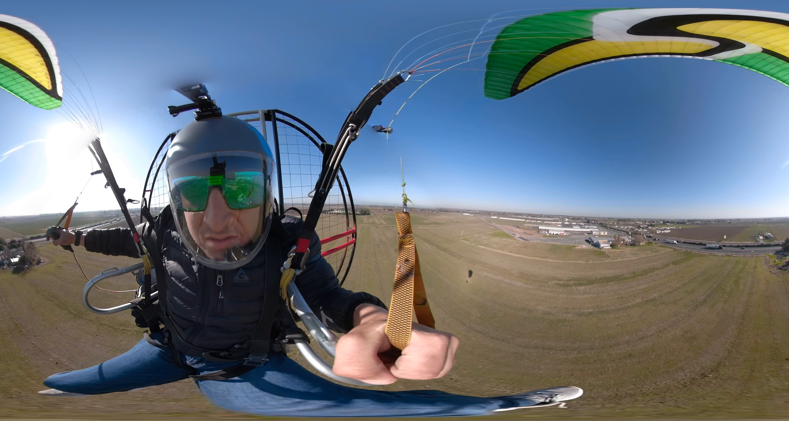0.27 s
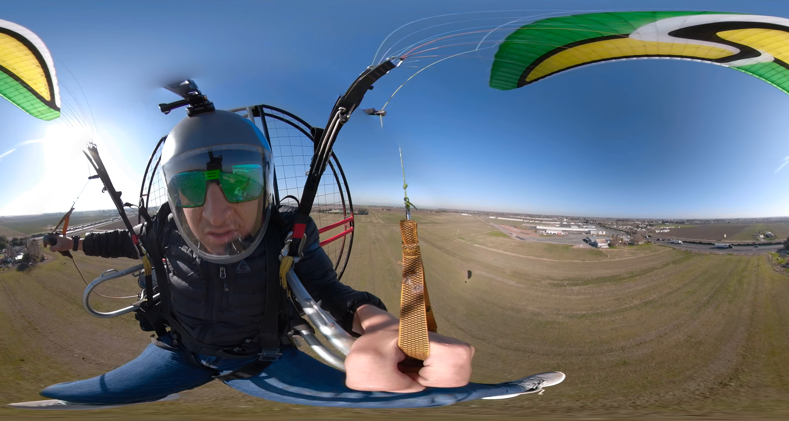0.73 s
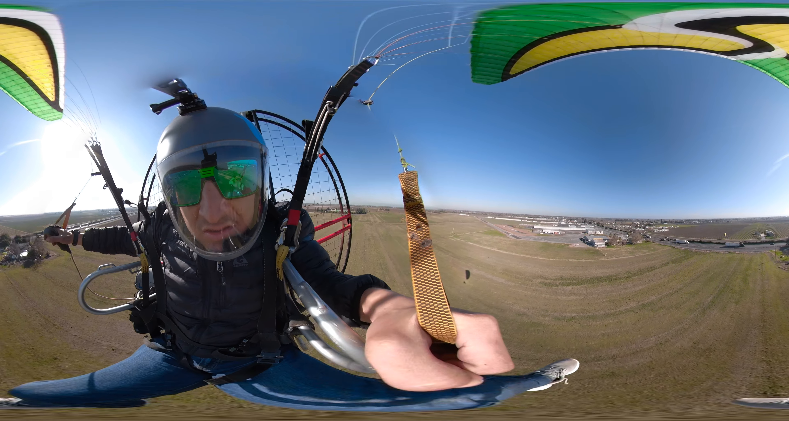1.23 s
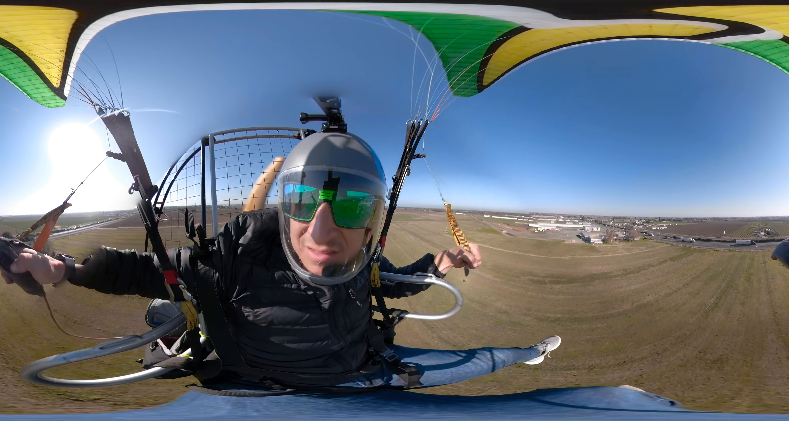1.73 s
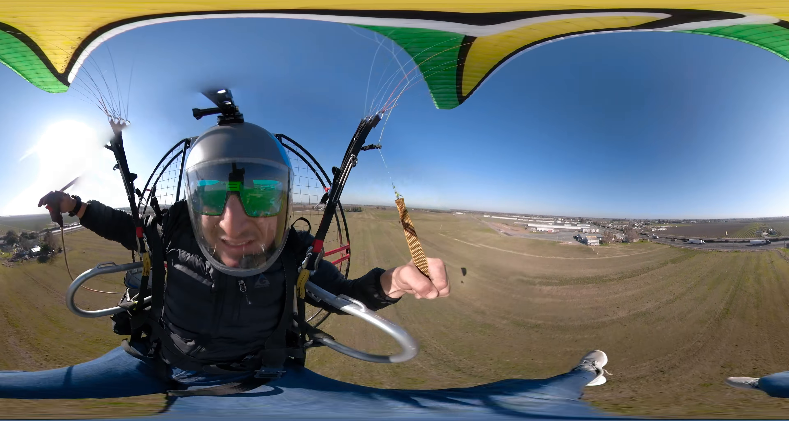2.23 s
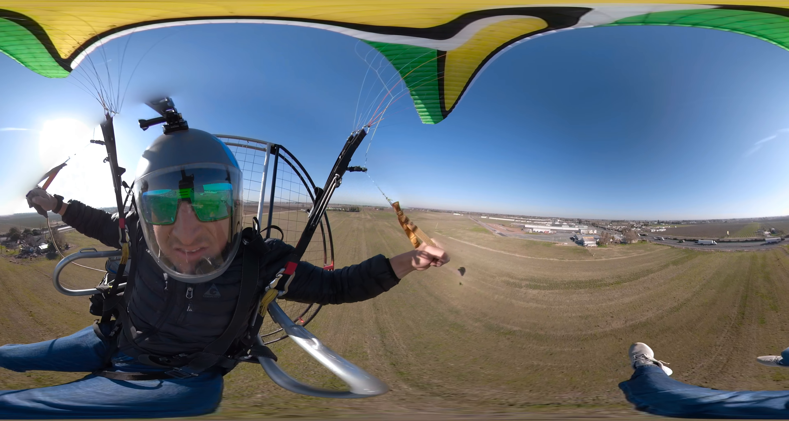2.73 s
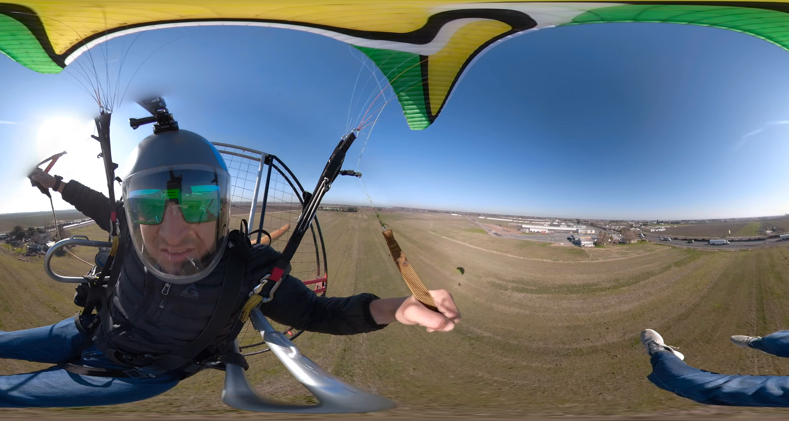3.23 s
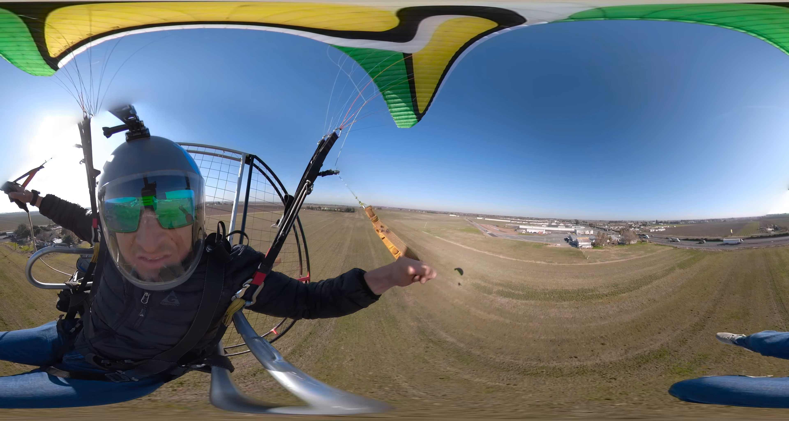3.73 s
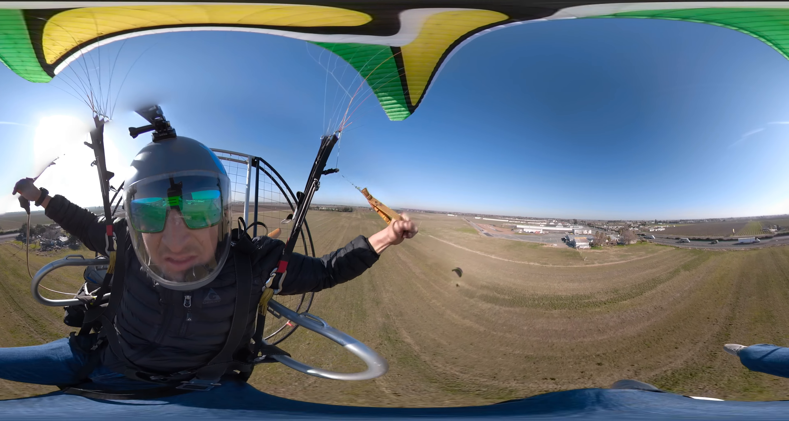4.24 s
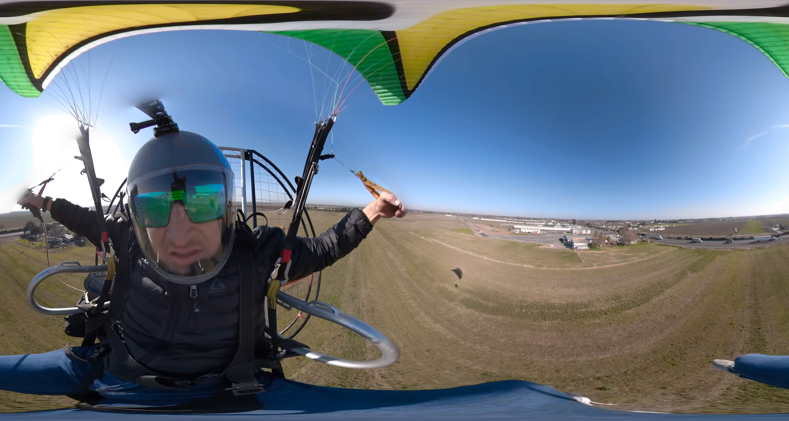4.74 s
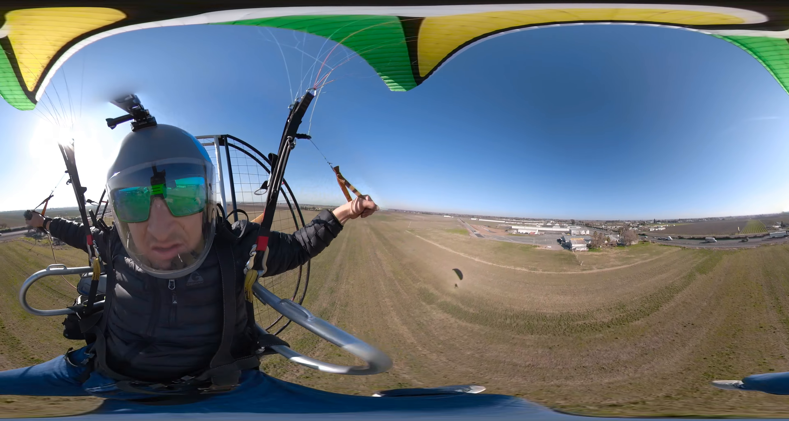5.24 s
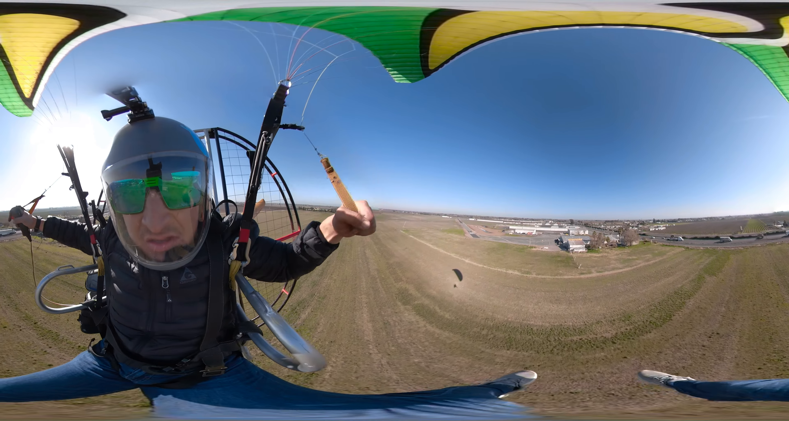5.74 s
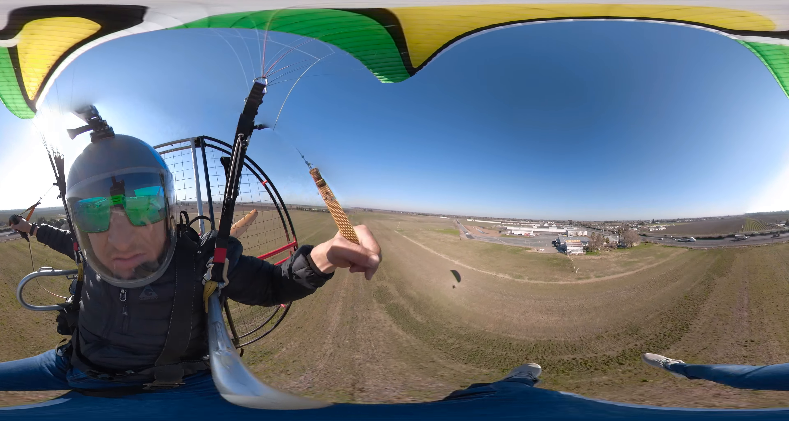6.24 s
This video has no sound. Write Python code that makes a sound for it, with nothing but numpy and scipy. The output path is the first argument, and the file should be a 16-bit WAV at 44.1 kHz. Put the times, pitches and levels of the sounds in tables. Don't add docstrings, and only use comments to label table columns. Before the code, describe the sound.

Rough, sputtering propeller motor drone stops abruptly; slowing puffs, metallic chirp and thump, loose ticks and ringing follow, then mostly low wind rumble.

```python
import sys
import numpy as np
from scipy import signal
from scipy.io import wavfile
from scipy.ndimage import uniform_filter1d

SR = 44100
rng = np.random.default_rng(int(sys.argv[2]) if len(sys.argv) > 2 else 0)


def gain_from_decibels(decibels):
    exponent = np.asarray(decibels, float) / 20
    return 10 ** exponent


def generate_wav(signal):
    frames = np.transpose(np.atleast_2d(signal))
    scaled = np.clip(frames, -1, 1) * 32767
    pcm = np.round(scaled).astype(np.int16)
    wavfile.write(sys.argv[1], SR, pcm)


N = 285768

# time_s, speed_turns_per_s
CRANK_SPEED = [(0, 47), (2.54, 46.6), (2.67, 41.4), (2.97, 31.5), (3.25, 23.6), (3.5, 16.6), (3.7, 13.5),
               (3.9, 10), (4.2, 7), (6.48, 1)]
FULL_SPEED, IGNITION_CUT_S, CRANK_STOPS_S = 47, 2.55, 4.22
ROCK_LEAD_TURNS = .37


def rms_one(x):
    return x / np.sqrt(np.mean(x ** 2) + 1e-20)


def in_time(rows):
    s, *columns = np.transpose(rows)
    return [np.interp(np.arange(N) / SR, s, c) for c in columns]


def drift(rate):
    r = np.exp(-80 * np.pi * rate / SR)
    white = rng.standard_normal(N // 40 + 2002)
    slow = signal.lfilter([1], [1, -2 * r, r * r], white)[2000:]
    return np.interp(np.arange(N) / 40, np.arange(len(slow)), rms_one(slow))


def clicks(times, gains):
    out = np.full(N, 1e-18)
    at = np.round(np.asarray(times) * SR).astype(int)
    np.add.at(out, np.clip(at, 0, N - 1), gains)
    return out


def soften(x, window):
    return np.convolve(x, window)[:N]


def strike(times, gains, modes, scatter_db):
    out, chance = 0, rng.standard_normal((len(times), len(modes)))
    for (hz, level_db, t60), luck in zip(modes, chance.T):
        r, w = gain_from_decibels(-60 / (t60 * SR)), 2 * np.pi * hz / SR
        blows = clicks(times, gains * gain_from_decibels(level_db + scatter_db * luck))
        out = out + signal.lfilter([0, np.sin(w)], [1, -2 * r * np.cos(w), r * r], blows)
    return out


def chatter(times, gains, modes):
    touches = (np.asarray(times)[:, None] + .006 * rng.random((len(times), 6))).ravel()
    return soften(strike(touches, np.repeat(gains, 6), modes, scatter_db=4), np.hanning(7) / 2)


def narrow_noise(peaks, flicker_db, rate):
    out = 0
    for hz, width, level_db in peaks:
        r = np.exp(-np.pi * width / SR)
        b, a = [1, 0.011, -0.992], [1, -2 * r * np.cos(2 * np.pi * hz / SR), r * r]
        once = signal.lfilter(b, a, rng.standard_normal(N))
        ringing = signal.lfilter(b, a, once)
        out = out + gain_from_decibels(level_db + flicker_db * drift(rate)) * rms_one(ringing)
    return out


def banded_noise(spectrum, patchy_db, shared, rate):
    hz, level_db = np.transpose(spectrum)
    out, together, white = 0, drift(rate), rng.standard_normal((2, N))
    edges = hz[0] * 2 ** np.arange(0, np.log2(min(hz[-1], 17000) / hz[0]), 1 / 3)
    for k, (low, high) in enumerate(zip(edges, edges[1:])):
        band_filter = signal.butter(2, [low, high], "band", fs=SR, output="sos")
        band = signal.sosfilt(band_filter, white[k % 2])
        colour_db = np.interp(np.log(low * high) / 2, np.log(hz), level_db)
        out = out + gain_from_decibels(colour_db + patchy_db * (shared * together + drift(rate))) * band
    return rms_one(out)


def wavering(hz, width):
    steps = np.cumsum(width) / SR
    luck = rng.standard_normal((2, int(steps[-1]) + 2))
    a, b = (np.interp(steps, np.arange(len(row)), row) for row in luck)
    phase = 2 * np.pi * np.cumsum(hz) / SR
    return rms_one(a * np.cos(phase) + b * np.sin(phase))


def firings():
    # start_s, level_db
    fired = [(0.0771, -4.5), (0.143, -5), (0.1627, -2.5), (0.2054, -0.5), (0.247, 1), (0.272, -4),
             (0.3082, 2), (0.3513, 0.5), (0.4152, 4), (0.4585, 3.5), (0.5009, 1), (0.5423, 4.5),
             (0.5837, 0.5), (0.628, 1), (0.692, 1), (0.735, -0.5), (0.7996, 2.5), (0.8402, 0), (0.9074, 1),
             (0.949, 4), (0.9914, 0.5), (1.033, 2.5), (1.0991, 2.5), (1.1416, 3.5), (1.1836, -1),
             (1.248, 1), (1.2896, 2), (1.3326, 0.5), (1.3763, -2.5), (1.418, -5), (1.461, -5.5), (1.526, 0),
             (1.569, 0.5), (1.6295, -0.5), (1.674, -3), (1.7141, -5.5), (1.758, -4.5), (1.803, -3),
             (1.8621, -0.5), (1.9063, -1.5), (1.9482, -3), (1.969, -4.5), (2.009, 1), (2.0524, -5),
             (2.0943, 0), (2.135, -3.5), (2.203, -2.5), (2.245, 2.5), (2.3086, -2.5), (2.352, 2),
             (2.394, 1), (2.437, -4), (2.456, -4), (2.501, -3.5), (2.5221, -4), (2.543, -1)]
    s, db = np.transpose(fired)
    return s, db


def crank(fired_s):
    compressions = [2.965, 3.066, 3.178, 3.304, 3.403, 3.516, 3.659, 3.755, 3.844, 3.957, 4.087, 4.185]
    free = np.cumsum(in_time(CRANK_SPEED)[0]) / SR
    marks = free[(np.r_[fired_s, compressions] * SR).astype(int)]
    whole = np.cumsum(np.r_[0, np.round(np.diff(marks))])
    count = len(fired_s)
    marks[:count] = whole[:count] + uniform_filter1d((marks - whole)[:count], size=7)
    turns = np.r_[-marks[0], whole, whole[-1] + free[-1] - marks[-1]]
    return np.interp(free, np.r_[0, marks, free[-1]], turns)


def load():
    t, slower_db = np.arange(N) / SR, 20 * np.log10(in_time(CRANK_SPEED)[0] / FULL_SPEED)
    since_cut = np.maximum(t - IGNITION_CUT_S, 0)
    coasting = np.clip((t - IGNITION_CUT_S) / .05, 0, 1)
    pump_db = 1 + 2.7 * slower_db
    chuff_db = -10.5 + 0.71 * slower_db - 8 * np.exp(-since_cut / 0.52)
    chuff_db = chuff_db - 50 * (1 - coasting * (t < CRANK_STOPS_S))
    blade_db = -1 + 0.59 * slower_db - 28 * np.maximum(t - IGNITION_CUT_S - .15, 0)
    hiss_db = -49 - 1.5 * coasting + slower_db - 40 * np.clip(t - CRANK_STOPS_S, 0, 2)
    return pump_db, chuff_db, blade_db, hiss_db


def pops(fired_s, fired_gain):
    # pitch_hz, level_db, t60_s
    pop_modes = [(122, -18, 0.036), (165.4, -16.5, 0.076), (310, -15.5, 0.022)]
    early = strike(fired_s - .0017, fired_gain, pop_modes[2:], scatter_db=3)
    return early - strike(fired_s + .0014, fired_gain, pop_modes[:2], scatter_db=3)


def pumping(turn_s, missed, pumped):
    # pitch_hz, level_db, t60_s
    pump_modes = [(49.3, -39.5, 0.19), (317, -20, 0.029), (449, -17.5, 0.035)]
    suck_modes = [(120, -19, .04), (166, -19, .04)]
    slosh_modes = [(266.3, -11.5, 0.049)]
    coasting = turn_s > IGNITION_CUT_S
    late = .00025 * rng.standard_normal(len(turn_s))
    dip_s = turn_s - .002 + late * missed * (1 + 2 * coasting)
    out = -strike(dip_s, pumped, pump_modes, scatter_db=2.5)
    out -= strike(turn_s - .002, missed * pumped, suck_modes, scatter_db=0.5)
    slosh_gain = missed * (turn_s < IGNITION_CUT_S) * pumped
    return out + strike(turn_s + .00754 + late, slosh_gain, slosh_modes, scatter_db=2.0)


def chuffs(turn_s, coasting_gain):
    # pitch_hz, level_db, t60_s
    chuff_modes = [(110.7, 4, 0.084), (137, 0, 0.046), (225.6, -9.5, 0.21), (390, -11.5, 0.073)]
    # peak_s, spread_s, pitch_hz, level_db, t60_s
    cold_modes = [
        (2.736, 0.091, 240, -10, 0.057),
        (3.35, 0.052, 240, -19, 0.16),
        (3.32, 0.039, 74, -18, .12),
    ]
    out = strike(turn_s - .0075, coasting_gain, chuff_modes, scatter_db=.8)
    for peak_s, spread_s, *mode in cold_modes:
        gain = (turn_s > IGNITION_CUT_S) * gain_from_decibels(-((turn_s - peak_s) / spread_s) ** 2)
        out += strike(turn_s + .00754, gain, [mode], scatter_db=1)
    return out


def cracks(fired_s, fired_gain, turn_s, missed):
    # pitch_hz, level_db, t60_s
    crack_modes = [(417.6, -15, 0.029), (549, -25.5, 0.047), (855, -25.5, 0.027), (1150, -21, 0.0096),
                   (1545, -21.5, 0.019), (1867, -33, 0.03), (3514, -34, 0.027), (5630, -29.5, 0.03)]
    sharp = strike(fired_s - .0005, fired_gain, crack_modes[:2], scatter_db=2)
    sharp -= strike(fired_s + 0.000912, fired_gain, crack_modes[2:], scatter_db=2)
    sputter = gain_from_decibels(-13.5 + 4 * rng.standard_normal(len(turn_s))) * missed * (turn_s < IGNITION_CUT_S)
    sharp -= strike(turn_s + .001, sputter, crack_modes, scatter_db=2.0)
    return soften(sharp, np.hanning(9) / 4)


def reed_valve(turn_s):
    # time_s, level_db
    reed_levels = [(2.7, -50), (2.95, -38), (3.15, -31), (3.42, -30), (3.6, -35), (4.0, -48), (4.2, -70)]
    # pitch_hz, level_db, t60_s
    putt_modes = [(1850, -1, .028), (2020, -2, .026), (1550, -9, .015), (2300, -8, .014)]
    gain = gain_from_decibels(np.interp(turn_s, *np.transpose(reed_levels)) - 3)
    return soften(strike(turn_s - .002, gain, putt_modes, scatter_db=2), np.hanning(9) / 4)


def gas_gate(fired_s, fired_db, turn_s, missed, pump_turn_db):
    lead_s = (turn_s > IGNITION_CUT_S) * ROCK_LEAD_TURNS * np.gradient(turn_s)
    puff_db = 9.0 + pump_turn_db / 5 + rng.standard_normal(len(turn_s))
    puffs = clicks(fired_s - .004, gain_from_decibels(fired_db + 15.5))
    puffs += clicks(turn_s - .002 - lead_s, missed * gain_from_decibels(puff_db))
    t = np.arange(0, .03, 1 / SR) / .0025
    return signal.fftconvolve(puffs, t ** 2 * np.exp(-t))[:N]


def exhaust(angle, fired_s, fired_db, pump_db, chuff_db):
    at = np.flatnonzero(np.diff(np.floor(angle)))
    turn_s, fired_gain = at / SR, gain_from_decibels(fired_db)
    missed = np.abs(turn_s[:, None] - fired_s).min(axis=1) > .005
    low = pops(fired_s, fired_gain) + pumping(turn_s, missed, gain_from_decibels(pump_db[at]))
    low += chuffs(turn_s, gain_from_decibels(chuff_db[at]))
    opening = np.hanning(45)
    sound = soften(low, opening / opening.sum()) + reed_valve(turn_s)
    sound += cracks(fired_s, fired_gain, turn_s, missed)
    return sound, gas_gate(fired_s, fired_db, turn_s, missed, pump_db[at])


def gas_hiss(hiss_db, drag_db, gate):
    # pitch_hz, level_db (per Hz)
    hiss_spectrum = [(1100, -2), (1800, -5), (2760, -10.5), (3400, -5), (4270, -14.5), (5600, 3),
                     (6500, -8.5), (7500, -14), (8600, -33.5), (9500, -18), (10800, -15), (13000, -28),
                     (15500, -42), (17000, -70)]
    lifted_db = -28 * np.maximum(np.arange(N) / SR - 5.14, 0)
    level = np.hypot(gain_from_decibels(hiss_db), gain_from_decibels(drag_db + 1.5 + lifted_db))
    return level * (1 + gate) * banded_noise(hiss_spectrum, patchy_db=1, shared=1.0, rate=140)


def propeller(angle, level_db):
    # multiple, level_db
    blade_tones = [(1, -30), (2, -35), (3, -25), (4, -28), (5, -36), (6, -34), (7, -26), (8, -35),
                   (11, -42)]
    blade = 2 * np.pi * .643 * angle
    out = gain_from_decibels(-60) * np.sin(blade + 2 * np.pi * angle)
    for multiple, tone_db in blade_tones:
        phase = round(multiple) * blade + 0.6 * drift(1.12) + rng.uniform(0, 2 * np.pi)
        out = out + gain_from_decibels(tone_db + 0.86 * drift(13.0)) * np.sin(phase)
    return np.sqrt(2) * gain_from_decibels(level_db) * out


def rocking(angle):
    # pitch_hz, level_db, t60_s
    rock_modes = [(5100, 0, .014), (5500, -3, .012), (3550, -7, .018), (7600, -12, .01)]
    s = np.flatnonzero(np.diff(np.floor(angle + ROCK_LEAD_TURNS))) / SR
    return chatter(s - .001, gain_from_decibels(-43 - ((s - 3.54) / .06) ** 2), rock_modes)


def jolts():
    # start_s, level_db
    jolt_events = [(1.1, -46), (1.378, -49), (1.529, -38.5), (1.57, -46), (1.907, -42), (2.011, -50),
                   (2.097, -53), (2.356, -45)]
    # pitch_hz, level_db, t60_s
    bracket_modes = [(3480, 0, .03), (3700, -1, .025)]
    s, db = np.transpose(jolt_events)
    return chatter(s, gain_from_decibels(db), bracket_modes)


def shoe_drag():
    # time_s, level_db
    drag_levels = [(0, -49), (.4, -60), (2.4, -54), (2.8, -63), (3.3, -55), (3.8, -51), (4.25, -62.5),
                   (4.55, -60.5), (4.75, -57), (5.1, -55), (5.3, -65), (5.5, -75.5), (5.9, -86.5),
                   (6.1, -92), (6.48, -98)]
    return in_time(drag_levels)[0]


def clutch(drag_db):
    # start_s, level_db
    catches = [(.94, -45), (2.57, -41), (3.1, -60), (3.24, -48), (3.431, -38.5), (3.7, -40), (3.779, -40),
               (3.96, -38), (4.01, -45), (4.11, -45), (4.46, -72), (4.63, -46), (4.8, -70), (5.0, -50),
               (5.09, -39), (5.17, -48), (5.29, -65)]
    # time_s, pitch_hz, width_hz, partner_db
    ring_course = [(0, 7180, 110, -9), (3.0, 7130, 110, -12), (3.75, 7180, 120, -8), (3.95, 7125, 70, -6),
                   (4.5, 7110, 60, -10), (4.75, 7140, 80, -12), (5.05, 7090, 70, -12), (5.3, 7135, 80, -12),
                   (6.48, 7130, 90, -14)]
    # pitch_hz, width_hz, level_db
    drum_peaks = [(3400, 140, -24), (7550, 900, -9), (10500, 2200, -29)]
    s, db = np.transpose(catches)
    t = np.arange(0, .25, 1 / SR)
    swell = (1 - np.exp(-t / 0.0084)) * np.exp(-t / 0.0089) * 2
    caught = signal.fftconvolve(clicks(s, gain_from_decibels(db)), swell)[:N]
    hz, width, partner_db = in_time(ring_course)
    ring = gain_from_decibels(-1 + 4 * drift(31)) * wavering(hz, 1.6 * width)
    ring += gain_from_decibels(partner_db + 4 * drift(20)) * wavering(0 * hz + 7335, width)
    return (gain_from_decibels(drag_db) + caught) * (ring + narrow_noise(drum_peaks, flicker_db=6, rate=20))


def squeal():
    # start_s, length_s, lowest_hz, level_db
    squeals = [
        (3.828, .034, 3325, -25),
        (3.864, .04, 3322, -39),
        (3.908, .06, 3385, -58),
        (3.965, .055, 3385, -54),
    ]
    overtones = [(-22, 1, 0), (-20, 2, 14), (-46, 1, 5), (-73, 1.2, 0)]
    out = np.zeros(N)
    for s, length, hz, level_db in squeals:
        t = np.arange(0, length, 1 / SR)
        slip = (2 * t / length - 1) ** 4
        pitch = hz + 22 * drift(400)[:len(t)] + 190 * slip * gain_from_decibels((level_db + 25) / 2)
        phase = 2 * np.pi * np.cumsum(pitch) / SR
        shape = np.minimum(1, np.minimum(t / .002, (length - t) / .008))
        tone = 0
        for k, (top_db, growth, loss_db) in enumerate(overtones):
            tone_db = top_db + growth * (level_db + 25) - loss_db * slip
            if k == 0:
                tone_db = tone_db - 9 * t / length
            tone = tone + gain_from_decibels(tone_db) * np.sin((k + 1) * phase)
        out[round(s * SR):][:len(t)] += np.sqrt(2) * shape * tone
    return out * (gain_from_decibels(2 * drift(120)) + gain_from_decibels(-17) * drift(500))


def bite():
    # pitch_hz, level_db, t60_s
    grip_modes = [(620, -22, .012), (760, -27, .01)]
    snap_modes = [(5750, -30, .018), (6100, -38, .02), (3650, -36, .02)]
    knock_modes = [(740, -44, 0.0081), (1140, -45, 0.0079), (1510, -36, 0.016), (1930, -41, 0.013)]
    thump_s = 3.8388
    t = np.maximum(np.arange(N) / SR - thump_s, 0)
    hz = 140 * (1 + 2.4 * np.exp(-t / .0023)) * (t > 0)
    swell = (1 - np.exp(-t / .003)) * np.exp(-t / .009) * 2
    thump = -gain_from_decibels(-5.5) * swell * np.sin(2 * np.pi * np.cumsum(hz) / SR)
    front = strike([thump_s], 0.96, grip_modes, scatter_db=5)
    return thump + front + chatter([3.826], [1], snap_modes) + chatter([3.846], [1], knock_modes)


def ticks():
    # start_s, peak_db, pitch_hz, top_db, low_db
    tick_events = [(2.939, -30, 5050, -17, -10), (3.8745, -27, 5900, -24, -12),
                   (3.8984, -35, 5690, -20, -12), (3.972, -39, 5500, -20, -12), (4.018, -29, 4840, -22, -5),
                   (4.1031, -40, 5700, -20, -12), (4.1814, -39, 5320, -18, -10),
                   (4.6968, -29.5, 5060, -19, 2), (4.83, -38, 5500, -21, 5), (4.854, -29, 5500, -22, 0),
                   (4.867, -33, 5640, -30, -16), (4.894, -36, 6000, -22, -8), (4.918, -37, 5410, -15, -10),
                   (4.9737, -36, 5590, -28, -12), (5.0507, -24, 5000, -22, -6),
                   (5.115, -27.5, 5800, -17, 1), (5.1687, -23, 6200, -23, -5), (5.3718, -34, 5000, -18, 6),
                   (5.4335, -42, 3300, -17, -2), (5.667, -58, 6200, -13, -5), (5.7084, -57, 4630, -22, -7),
                   (5.9234, -56, 4710, -12.5, -9), (6.2134, -50, 5680, -22, -9)]
    out, t = np.zeros(N), np.arange(600) / SR
    for s, peak_db, hz, top_db, low_db in tick_events:
        burst = rng.standard_normal(len(t)) + 6 * (t == t[18])
        burst = burst * np.minimum(t / .0004, 1) * np.exp(-t / 0.001)
        bands = ((hz / 1.2, hz * 1.2, 0), (4200, 8000, -3),
                 (2300, 3900, low_db), (8300, 14500, np.clip(top_db, -32, -8)))
        for low, high, db in bands:
            part = signal.sosfilt(signal.butter(2, [low, high], "band", fs=SR, output="sos"), burst)
            out[round((s - .001) * SR):][:len(t)] += gain_from_decibels(peak_db - 1 + db) * part / np.abs(part).max()
    return out


def housing(x):
    dip = signal.butter(1, [3950, 4650], "band", fs=SR, output="sos")
    dipped = x - 0.5 * signal.sosfilt(dip, x)
    low = signal.sosfilt(signal.butter(8, 8200, "low", fs=SR, output="sos"), dipped)
    high = signal.sosfilt(signal.butter(8, [8200, 13500], "band", fs=SR, output="sos"), dipped)
    return low + gain_from_decibels(-5.5) * high


def grit():
    # start_s, peak_db
    crackle = [(3.2013, -57), (3.2442, -56), (3.2772, -48), (3.2886, -56), (3.3191, -51), (3.3854, -53),
               (3.3854, -50), (3.4307, -55), (3.495, -40), (3.5411, -50), (3.5585, -46), (3.5845, -53),
               (3.6079, -43), (3.6309, -42), (3.6837, -46), (3.7441, -54), (3.7571, -52), (3.766, -56),
               (3.796, -58),
               (5.4997, -72), (5.5167, -67), (5.544, -72), (5.6055, -73), (5.6259, -72), (5.6663, -62),
                    (5.7112, -62), (5.8444, -65)]
    # pitch_hz, level_db, t60_s
    grit_modes = [(9300, -6, .004), (10600, -4, .004), (11800, -8, .004)]
    s, db = np.transpose(crackle)
    return soften(strike(s, gain_from_decibels(db), grit_modes, scatter_db=4), [.5, 1, .5])


def hum():
    # time_s, low_hz, low_db, high_hz, high_db
    hum_course = [(3.2, 358, -70, 920, -66), (3.5, 356, -62, 918, -52), (3.62, 354, -42, 911, -50),
                  (3.78, 352, -44, 908, -49), (3.95, 350, -50, 902, -52), (4.5, 345, -48, 895, -50),
                  (4.75, 342, -43, 890, -52), (5.1, 340, -46, 885, -53), (5.5, 338, -62, 880, -70)]
    low_hz, low_db, high_hz, high_db = in_time(hum_course)
    out = 0
    for hz, db in ((low_hz, low_db), (high_hz, high_db)):
        level = np.sqrt(2) * gain_from_decibels(db + 2 * drift(6))
        out = out + level * np.sin(2 * np.pi * np.cumsum(hz + 4 * drift(8)) / SR)
    return out


def whistle():
    # time_s, pitch_hz, level_db
    whistle_course = [(6.07, 5000, -90), (6.09, 5350, -63), (6.12, 5600, -65), (6.15, 5950, -65),
                      (6.21, 6050, -66), (6.222, 5650, -61), (6.25, 5500, -66), (6.27, 5400, -90)]
    hz, level_db = in_time(whistle_course)
    phase = 2 * np.pi * np.cumsum(hz + 80 + 200 * drift(250)) / SR
    return gain_from_decibels(level_db - 1.5 + 4 * drift(60)) * np.sin(phase)


def wind(gate):
    # time_s, level_db
    airflow = [(0, -21.5), (.3, -23.5), (2.5, -23), (2.8, -25.5), (3.6, -27), (4.05, -27.5), (4.45, -25.5),
               (4.6, -25), (5.15, -23), (5.4, -24.5), (5.6, -24), (5.9, -24), (6.05, -24.5), (6.25, -24.5),
               (6.48, -25.5)]
    # peak_s, level_db, half_length_s
    eddies = [
        (3.04, -7, .08),
        (4.298, -3.5, 0.097),
        (4.484, -4, 0.055),
        (4.532, 6, 0.016),
        (4.672, 5, 0.019),
        (5.227, -11.5, 0.028),
        (5.288, 4.5, 0.075),
        (5.605, -6, 0.021),
        (6.332, -5.5, 0.055),
    ]
    # pitch_hz, level_db (per Hz)
    buffet_spectrum = [(8.8, -38), (15, 1), (81, 5), (226, -6), (255, -14), (341, -9.5), (373, -18),
                       (500, -21), (650, -63), (1100, -120)]
    rush_spectrum = [(150, -34), (250, -8.5), (297, 1.5), (369, -20.5), (439, -4), (816, -2.5), (890, -7),
                     (1280, -8.5), (2780, -24.5), (5300, -39), (6100, -68), (7200, -86), (17300, -120)]
    flow_db, = in_time(airflow)
    t = np.arange(N) / SR
    eddies_db = sum(db * np.exp(-((t - s) / half) ** 2) for s, db, half in eddies)
    buffet = banded_noise(buffet_spectrum, patchy_db=1.5, shared=1.0, rate=52)
    rush = banded_noise(rush_spectrum, patchy_db=0.83, shared=0.29, rate=27.0)
    rush = gain_from_decibels(-37.5 + 1.54 * (flow_db + 25)) * (1 + 0.49 * gate) * rush
    rush_low_pass = signal.butter(6, 6500, fs=SR, output="sos")
    return gain_from_decibels(flow_db + eddies_db) * buffet + signal.sosfilt(rush_low_pass, rush)


def scene():
    fired_s, fired_db = firings()
    angle = crank(fired_s)
    pump_db, chuff_db, blade_db, hiss_db = load()
    drag_db = shoe_drag()
    pulses, gate = exhaust(angle, fired_s, fired_db, pump_db, chuff_db)
    motor = pulses + rocking(angle) + jolts()
    drive = clutch(drag_db) + squeal() + bite() + grit() + hum()
    cased = housing(ticks() + gas_hiss(hiss_db, drag_db, gate))
    mix = motor + propeller(angle, blade_db) + drive + cased + whistle() + wind(gate)
    return mix[None]


def top_cut(x):
    return signal.sosfilt(signal.butter(12, 15350, fs=SR, output="sos"), x)


def record(dry):
    cut = signal.sosfilt(signal.butter(2, 22, "high", fs=SR, output="sos"), dry)
    noise_filter = signal.butter(10, 11800, fs=SR, output="sos")
    cut = cut + gain_from_decibels(-80) * signal.sosfilt(noise_filter, rng.standard_normal(dry.shape))
    rounded = .95 * np.tanh(cut / .95)
    return top_cut(rounded)


dry = scene()
out = record(dry)
generate_wav(out)
```